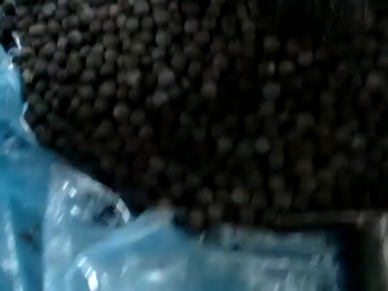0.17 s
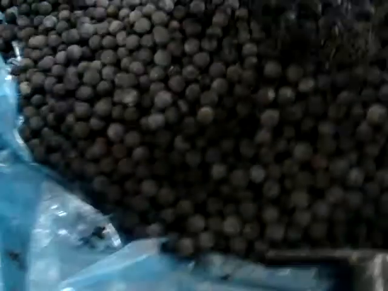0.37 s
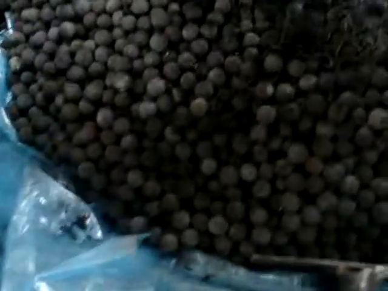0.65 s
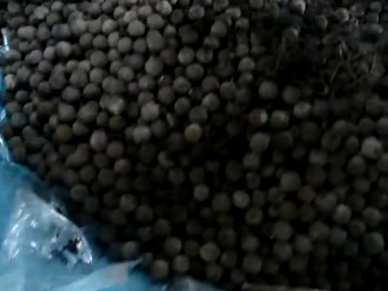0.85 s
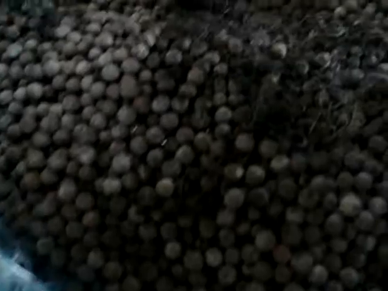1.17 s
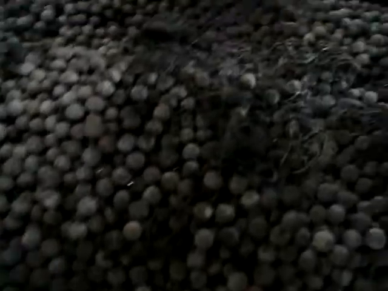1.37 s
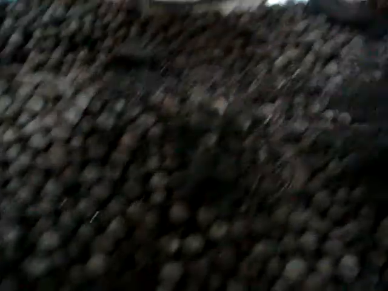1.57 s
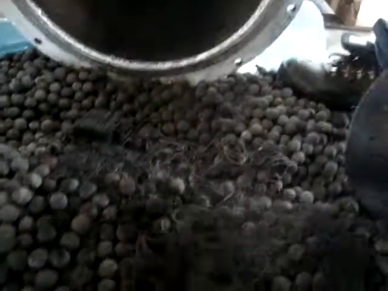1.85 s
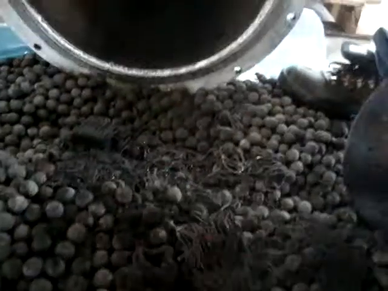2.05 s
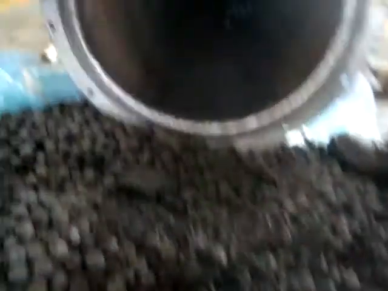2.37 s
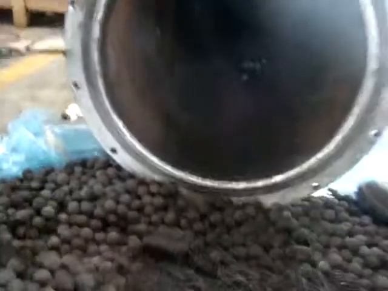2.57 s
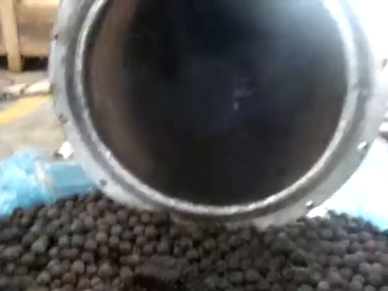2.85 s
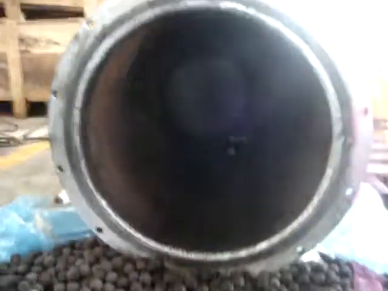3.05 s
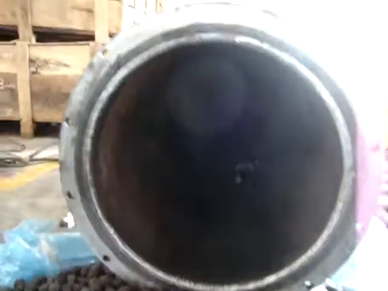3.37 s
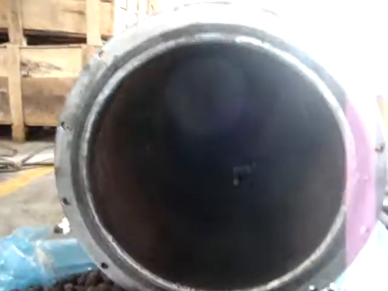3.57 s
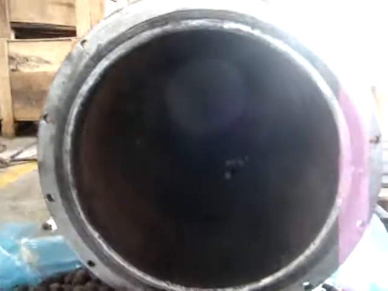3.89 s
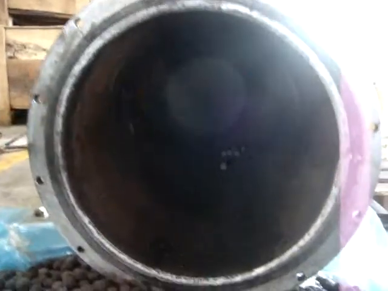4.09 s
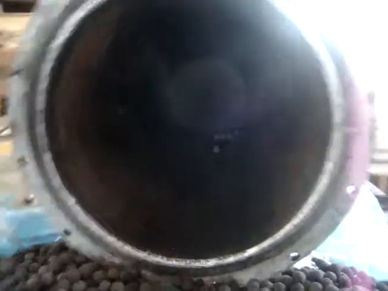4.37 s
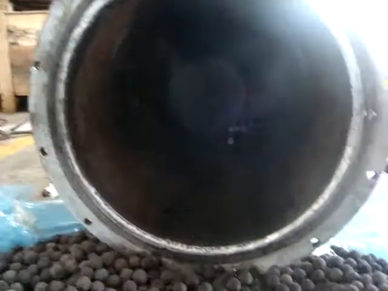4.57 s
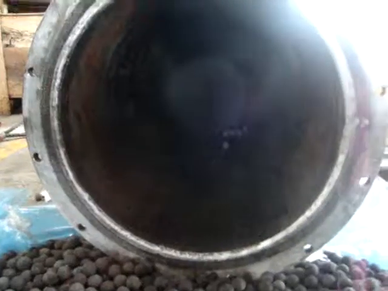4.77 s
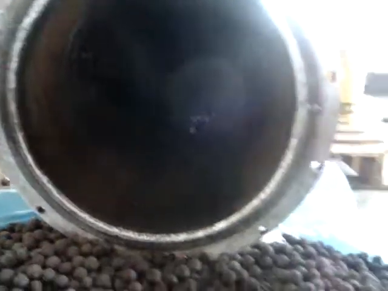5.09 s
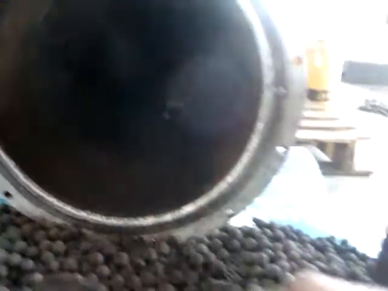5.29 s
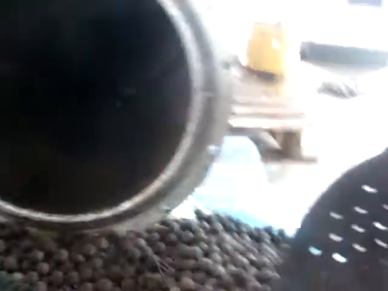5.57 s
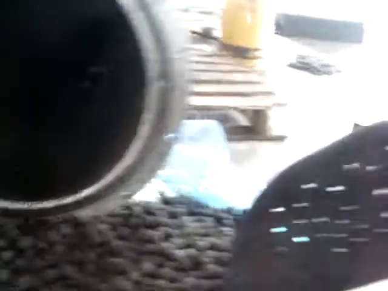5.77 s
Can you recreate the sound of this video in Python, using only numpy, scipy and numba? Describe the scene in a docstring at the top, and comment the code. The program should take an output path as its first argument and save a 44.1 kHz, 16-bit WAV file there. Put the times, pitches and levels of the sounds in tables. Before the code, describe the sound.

A blower whines and roars in an echoing factory hall while hard metal hammer blows clang and clatter, then the machinery runs on alone.

```python
"""A factory hall: from the start a blower whines and roars and a slow shaft throbs (wavering sines, noise).
At once a hammer begins on a steel frame: 13 blows in 3.7 s, each a hiss burst and many decaying tones,
with echoes of the hall. Meanwhile the whine slows a little, and the roar is uneven under the blows.
Throughout, a mono phone microphone turns its gain down at loud peaks and lets it creep back.
After the last blow the machines run on to the end, the roar steadier and its treble fading."""
import sys
import numpy as np
from scipy import signal
from scipy.fft import rfft, irfft, next_fast_len
from scipy.io import wavfile
from scipy.ndimage import minimum_filter1d
from numba import njit

SR = 44100
rng = np.random.default_rng(int(sys.argv[2]) if len(sys.argv) > 2 else 0)


def wav_out(sig):
    """Save sig, one row per channel (or a flat mono array), as 16-bit PCM at SR to the path in sys.argv[1]."""
    wavfile.write(sys.argv[1], SR, np.round(np.clip(np.atleast_2d(sig).T, -1, 1) * 32767).astype(np.int16))


def ratio_of_db(decibels):
    """Turn decibels (scalar or array-like) into linear amplitude factors; 0 dB maps to 1."""
    return 10 ** (np.asarray(decibels, float) / 20)


N = 261513   # length in samples, about 5.93 s

# Blower as heard from the moving phone.
# Each row: time in seconds, levels of the 1st, 2nd and 3rd harmonic in dB, level of the roar in dB.
BLOWER_LEVELS = [(0, -18, -30.5, -25.5, -16), (0.901, -19, -28, -25, -18.5), (1.35, -16, -28, -28.5, -14.5),
                 (1.6, -22.5, -18, -17, -13), (1.85, -26.5, -19, -24.5, -16.5),
                 (2.12, -24.5, -13.5, -21.5, -17), (2.5, -27.5, -20.5, -23, -13.5),
                 (3.001, -21.5, -9, -17.5, -9), (3.5, -25.5, -17.5, -34, -16),
                 (4, -27, -23.5, -29.5, -17.5), (5.3, -25.5, -23.5, -33, -16),
                 (5.93, -30, -29.5, -31, -16.5)]
# Speed of the blower. Each row: time in seconds, blade tone in Hz.
BLADE_SPEED = [(0, 412.5), (1.35, 412), (1.6, 408.5), (1.9, 406), (2.15, 405.5), (2.5, 403), (3, 401.3),
               (5.93, 401.1)]
# Steady partners of the blade tone. Each row: multiple of the blade tone, level in dB.
BLADE_PARTNERS = [(.357, -42.5), (4, -34), (5, -35.5), (6, -40.5), (8, -40.5)]
# Bearing whines. Each row: multiple of the blade tone, level in dB before the common lift in blower().
BEARING_WHINES = [(11.15, -45), (13.57, -49), (14.08, -47), (14.33, -38.5)]
# Color of the air roar. Each row: frequency in Hz, relative level in dB per Hz.
ROAR_COLOR = [(15, -74), (25, -50), (75, -35.5), (124, -26), (239, -18), (348, -11), (394, -11.5),
              (482, -9.5), (737, -7), (795, -9), (879, -7), (1190, -7), (1420, -10.5), (5620, -19.5),
              (10000, -33), (13000, -81), (22000, -120)]
# Treble of the roar over time. Each row: time in seconds, gain in dB relative to the rest of the roar.
ROAR_TREBLE_GAIN = [(0, 4), (.9, 1), (1.6, -1.6), (3.2, -1.3), (5.93, -6.3)]
# Slow shaft. Each row: multiple of the turning rate, level in dB.
SHAFT_TONES = [(8, -57.5), (9, -54), (10, -51), (11, -36), (14, -50), (35, -34.5), (41, -61)]
# Hammer blows. Each row: time in seconds, ring in dB, clatter in dB, brightness of the clatter in dB per
# octave, crack in dB relative to the clatter.
HAMMER_BLOWS = [(.024, -16.5, -9, -21, -10.5), (0.476, -4.5, 0, 0.8, -3.5), (.744, -4.5, -2.2, 10, 12),
                (.999, -3.5, -2.8, 7.5, 6.5), (1.227, 1.5, 8, 3, -11), (1.517, -9.5, -2.5, -5.5, -24),
                (2.148, 8.5, 8.5, 2.8, -25), (2.459, 11, 12, -1.2, -29), (2.661, 15, 14.5, -0.4, -4.5),
                (2.845, 3.7, 9.5, -8.5, -32.5), (3.2, -15.5, -21, -4.5, -31), (3.265, -9.5, -7, -11, -32),
                (3.734, -14.5, -19, 1, -29)]
# Where each blow lands along the bar. One value per blow: fraction of the bar's length (0-1).
STRIKE_PLACES = [.156, .872, .526, .515, .156, .503, .492, .409, .407, .411, .503, .409, .411]
# Strong modes (ways of ringing) of the steel frame. Each row: frequency in Hz, level in dB relative to the
# blow's ring when struck where the mode moves most, time to fall 60 dB in seconds, half-waves along the bar.
FRAME_MODES = [(345, -21, 1.2, 19.5), (785, -8, 1.5, 5.75), (915, -23.5, .96, 13.5), (975, -16, .9, 12.5),
               (1145, -17, 1.3, 12.25), (1515, -9.5, .4, 5.75), (1684, -3, .19, 5.75),
               (1965, -15, .5, 7.75), (2164, -24, .35, 6.25), (2292, -6, .6, 20), (2441, -20, .7, 6.25),
               (2570, -13, .21, 17.5), (2749, -5, .26, 16.75), (2782, 2.5, .24, 17),
               (2805, -16.5, .75, 16.25), (2925, -9, .16, 14.5), (3427, -10.5, .16, 19.75),
               (3686, -17, .34, 13.75), (3970, -11, .37, 17.25), (4057, -21, .42, 1.25),
               (4100, -22, .12, 12.25), (4570, -8, .27, 17.25), (4645, -7, .11, 14),
               (4974, -4.5, .18, 19.5), (5042, 2.5, .06, 12.25), (5100, -8, .38, 17.25),
               (5358, -13, .27, 4.75), (5711, -7, .11, 14.25), (7297, -5, .18, 2.25),
               (8411, -7, .09, 12.25)]
# Crowd of weaker modes, heard as clatter.
# Each row: frequency in Hz, time to fall 60 dB in seconds, level in dB relative to the blow's clatter.
CLATTER_MODES = [(1800, 0.76, -23), (2780, 0.13, -23), (4600, 0.14, -18.5), (6000, 0.15, -22.5),
                 (10460, 0.064, -32.5)]
# Modes of the hammer head. Each row: frequency in Hz, time to fall 60 dB in seconds, relative level in dB.
HEAD_MODES = [(5540, .03, 0.1), (5660, .03, 0.1), (6680, .03, -8)]


def at_hz(points, hz):
    """Read a spectrum between its points, with frequency on a log axis."""
    points = np.array(points)
    return np.interp(np.log(hz + 1), np.log(points[:, 0]), points[:, 1])


def over_time(points):
    """Read a table of (seconds, value) at every sample."""
    return np.interp(np.arange(N) / SR, *np.transpose(points))


def drift(rate_hz):
    """Slow chance of spread 1: noise smoothed twice, made at every 40th sample and joined by lines."""
    r = np.exp(-2 * np.pi * rate_hz * 40 / SR)
    noise = rng.standard_normal(N // 40 + 4002)
    slow = signal.lfilter([1], [1, -2 * r, r * r], noise)[4000:]   # skip the run-in
    return np.interp(np.arange(N) / 40, np.arange(len(slow)), slow / slow.std())


def tone(cycles, level_db, waver_db, waver_rad):
    """A sine around a given rms level, whose level and phase waver."""
    phase = 2 * np.pi * (cycles + rng.random()) + waver_rad * drift(5.1)
    height = np.sqrt(2) * ratio_of_db(level_db + waver_db * drift(27))
    return height * np.sin(phase)


def air_roar(level_db):
    """Rushing air: noise colored by a spectrum, with changing treble and a wavering level."""
    color = ratio_of_db(at_hz(ROAR_COLOR, np.fft.rfftfreq(N + 1, 1 / SR)))
    air = irfft(rfft(rng.standard_normal(N + 1)) * color)[:N]
    high_pass = signal.butter(1, 6000, "high", fs=SR, output="sos")
    treble = signal.sosfilt(high_pass, air)
    air = air + (ratio_of_db(over_time(ROAR_TREBLE_GAIN)) - 1) * treble
    return ratio_of_db(level_db + 0.93 * drift(11)) * air / air.std()


def blower():
    """Blade tone, harmonics and bearing whines all follow one speed; the air roars along with them."""
    whine_lift_db = 2
    s, *columns = np.transpose(BLOWER_LEVELS)
    first, second, third, roar_db = [np.interp(np.arange(N) / SR, s, c) for c in columns]
    cycles = np.cumsum(over_time(BLADE_SPEED)) / SR
    orders = [(1, first), (2, second), (3, third)] + BLADE_PARTNERS
    out = np.zeros(N)
    for k, db in orders:
        out += tone(k * cycles, db, waver_db=1.5, waver_rad=0.19 * np.sqrt(k))
    for k, db in BEARING_WHINES:
        out += tone(k * cycles, db + whine_lift_db, waver_db=3.5, waver_rad=1.0)
    return out + air_roar(roar_db)


def shaft():
    """Neighboring multiples of a slow turning rate beat once a turn, heard as a throb."""
    turns = 12.25 * np.arange(N) / SR   # 12.25 turns a second
    return sum(tone(k * turns, db, waver_db=1.5, waver_rad=0.1) for k, db in SHAFT_TONES)


def ring(at, heights, hz, t60):
    """Clicks set a mode ringing: a sine that falls 60 dB in t60 seconds."""
    clicks = np.full(N, 1e-18)   # a tiny floor, far below hearing
    clicks[at] = heights
    r, w = ratio_of_db(-60 / (t60 * SR)), 2 * np.pi * hz / SR
    return signal.lfilter([0, np.sin(w)], [1, -2 * r * np.cos(w), r * r], clicks)


def frame_ring(at, ring_db):
    """Each blow rings every strong mode by how much the bar moves in it at the place struck."""
    out = np.zeros(N)
    for hz, db, t60, waves in FRAME_MODES:
        movement = np.sin(np.pi * waves * np.array(STRIKE_PLACES))
        out += ring(at, ratio_of_db(ring_db + db) * movement, hz, t60)
    return out


def clatter(at, clatter_db, bright_db):
    """A hundred weaker modes, stirred by a different chance at every blow."""
    crowd = np.array(CLATTER_MODES)
    crowd_hz = np.linspace(1800, 10000, num=100) + rng.uniform(-38, 40, size=100)
    aim = rng.normal(0, 1, (len(at), len(crowd_hz)))
    out = np.zeros(N)
    for k, hz in enumerate(crowd_hz):
        t60, db = at_hz(crowd[:, [0, 1]], hz), at_hz(crowd[:, [0, 2]], hz)
        level_db = clatter_db + db + bright_db * np.log2(hz / 2500) + 4.5 * aim[:, k]
        push = np.sign(aim[::-1, k])   # up or down by chance
        out += ring(at, ratio_of_db(level_db) * push, hz, t60)
    return out


def hammer_head(at, clatter_db):
    """The hammer head rings briefly at each blow, and once alone as it rebounds."""
    rebound_s, rebound_db = 1.064, -0.5
    head_db = -24   # against the clatter
    taps = [*at, round(rebound_s * SR)]
    taps_db = np.append(clatter_db + head_db, rebound_db)
    return sum(ring(taps, ratio_of_db(taps_db + db), hz, t60) for hz, t60, db in HEAD_MODES)


def crack(at, level_db):
    """The sharp start of a blow: treble hiss that dies within hundredths of a second."""
    low_hz, t60_s = 3000, .02
    kicks = np.full(N, 1e-18)
    kicks[at] = ratio_of_db(level_db)
    fade = signal.lfilter([1], [1, -ratio_of_db(-60 / (t60_s * SR))], kicks)
    high_pass = signal.butter(2, low_hz, "high", fs=SR, output="sos")
    return fade * signal.sosfilt(high_pass, rng.standard_normal(N))


def hammer():
    """Each blow excites the frame, its clatter, the hammer head and a crack; the bass is cut."""
    s, ring_db, clatter_db, bright_db, crack_db = np.transpose(HAMMER_BLOWS)
    at = np.round(s * SR).astype(int)
    out = frame_ring(at, ring_db) + clatter(at, clatter_db, bright_db)
    out += hammer_head(at, clatter_db) + crack(at, clatter_db + crack_db)
    return signal.sosfilt(signal.butter(2, 250, "high", fs=SR, output="sos"), out)


def hall(x):
    """Echoes of the hall: ten feedback delays, weaker and duller on every round."""
    t60_s, wall_cut_hz = 0.58, 5900   # t60 holds for the bass
    size = next_fast_len(N + 2 * SR)
    hz = np.fft.rfftfreq(size, 1 / SR)
    echoes = 0
    for k, lag in enumerate(np.geomspace(.0113, .0497, num=10)):   # delays in seconds
        dulling = (1 + 1j * hz / wall_cut_hz) ** 0.18
        one_round = ratio_of_db(-60 * lag / t60_s) / dulling * np.exp(-2j * np.pi * hz * lag)
        echoes = echoes + (-1) ** k * one_round / (1 - one_round)   # sum of all rounds
    return irfft(rfft(x, size) * echoes, size)[:N]


@njit
def ride_gain(room_db, gain_db, attack, hold, release):
    """Fall fast to the headroom (the gain that peaks allow), wait, then creep back to 0 dB."""
    out, wait = np.empty(len(room_db)), 0
    for i in range(len(room_db)):
        if room_db[i] < gain_db:
            gain_db += attack * (room_db[i] - gain_db)
            wait = hold
        elif wait > 0:
            wait -= 1
        else:
            gain_db -= release * gain_db
        out[i] = gain_db
    return out


def ridden(x, ceiling_db, start_db, attack_s, hold_s, release_s):
    """Gain that follows the headroom above the treble-weighted peaks of about 2 ms."""
    treble_weight = 0.54
    heard = signal.lfilter([1 + treble_weight, -treble_weight], [1], x[0])
    peaks = -minimum_filter1d(-np.abs(heard), size=89)   # largest value within 89 samples
    room_db = ceiling_db - 20 * np.log10(peaks + 1e-9)
    gain_db = ride_gain(room_db, start_db, 1 / (attack_s * SR), hold_s * SR, 1 / (release_s * SR))
    return x * ratio_of_db(gain_db)


def scene():
    """Machines, blows and the blows' echoes, the same in both channels."""
    hall_db = -18
    blows = hammer()
    mix = blower() + shaft() + blows + ratio_of_db(hall_db) * hall(blows)
    return np.tile(mix, (2, 1))


def band_limit(x):
    """A steep low-pass at the top of the band."""
    return signal.sosfilt(signal.butter(12, 10210, fs=SR, output="sos"), x)


def record(dry):
    """The phone: slow gain control, a fast limiter, rounded peaks, then a steep treble cut."""
    even = ridden(dry, ceiling_db=-4.5, start_db=-6.5, attack_s=0.03, hold_s=0.32, release_s=0.49)
    limited = ridden(even, ceiling_db=-2, start_db=0., attack_s=0.00052, hold_s=0.00023, release_s=0.013)
    top = 1.2   # height that rounded peaks never pass
    rounded = top * np.tanh(limited / top)
    treble_cut = signal.ellip(10, 1, 70, 10200, fs=SR, output="sos")   # cut above 10200 Hz
    finished = signal.sosfilt(treble_cut, rounded)
    return band_limit(finished)


dry = scene()
out = record(dry)
wav_out(out)
```